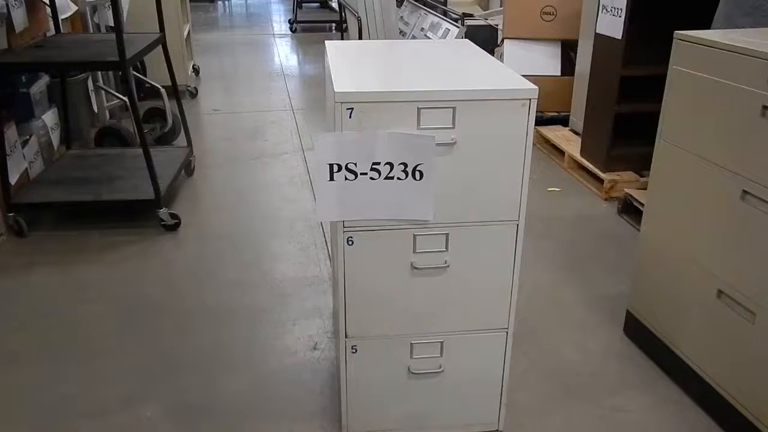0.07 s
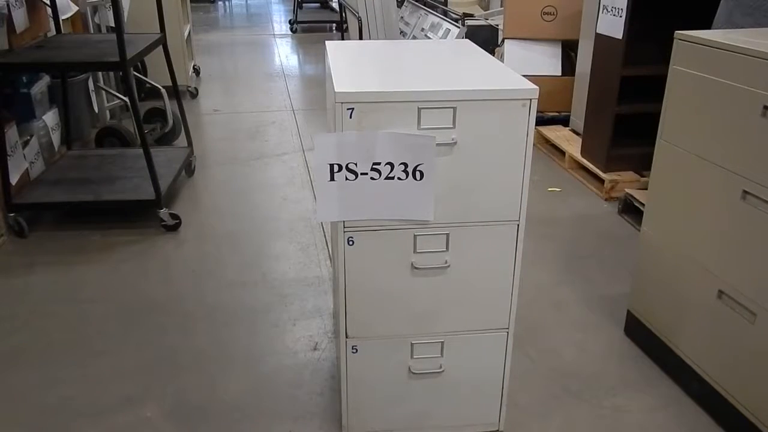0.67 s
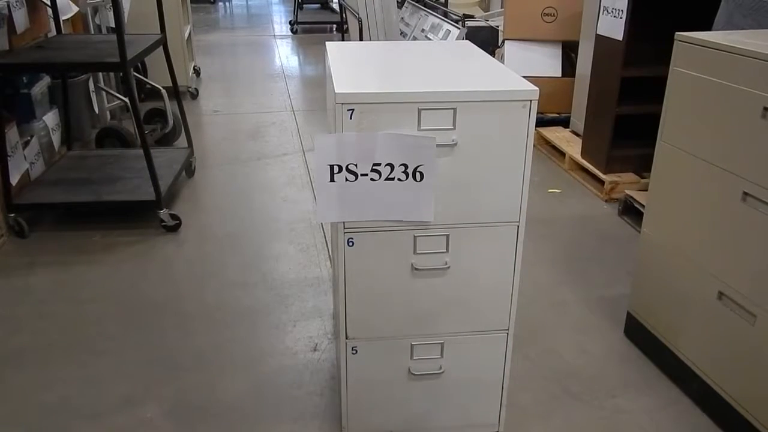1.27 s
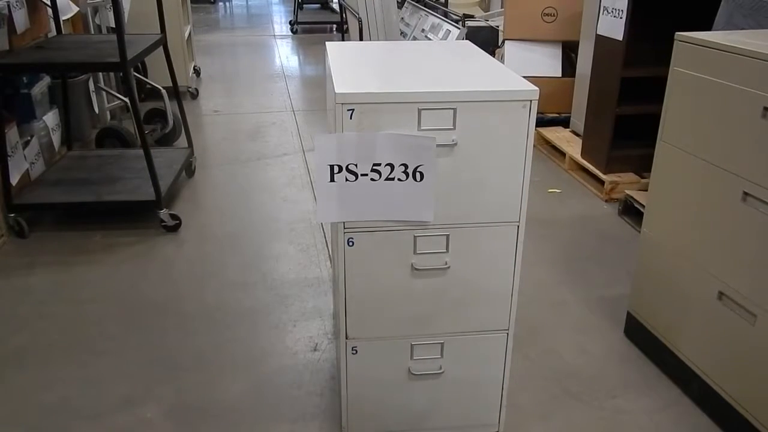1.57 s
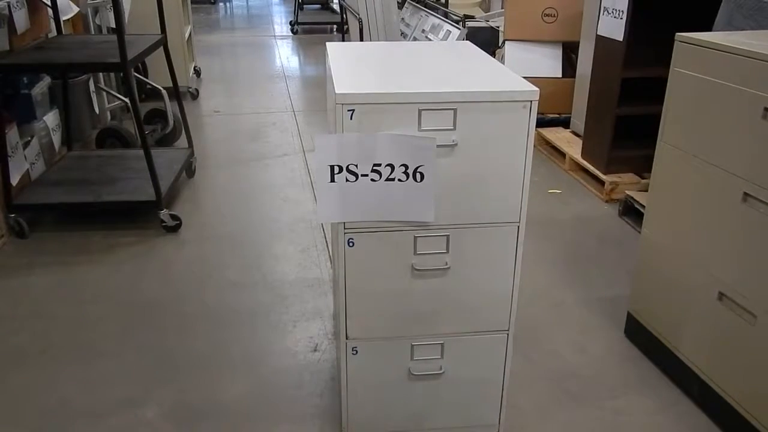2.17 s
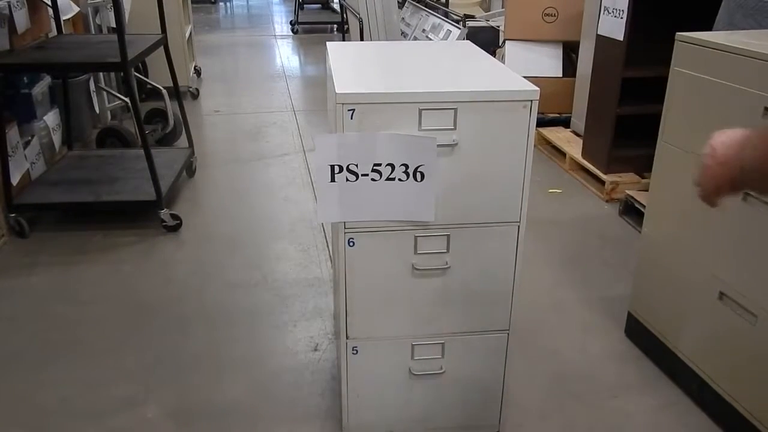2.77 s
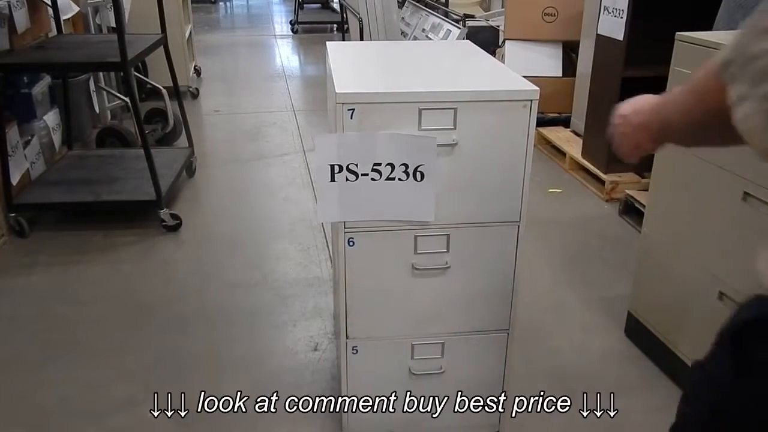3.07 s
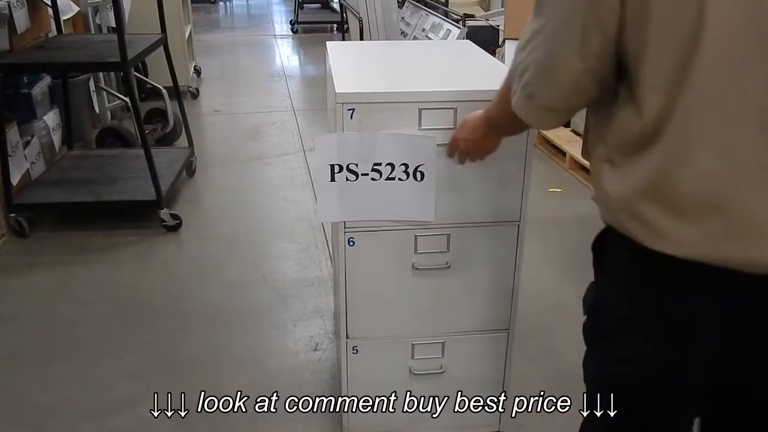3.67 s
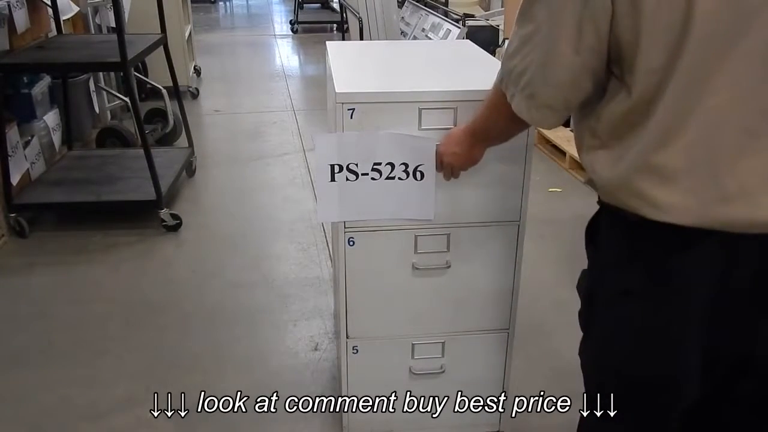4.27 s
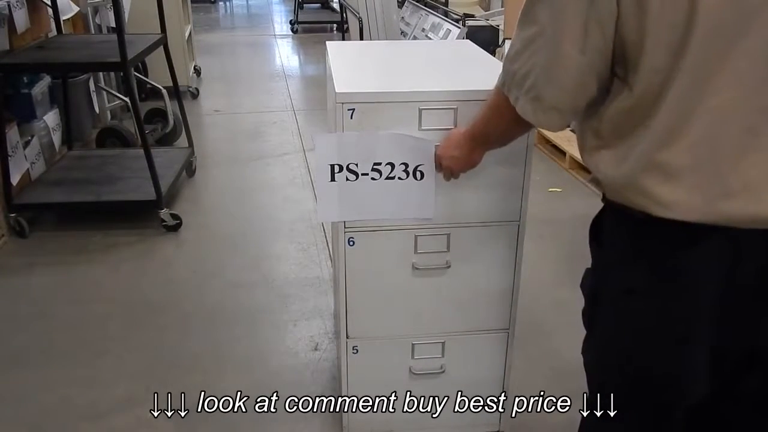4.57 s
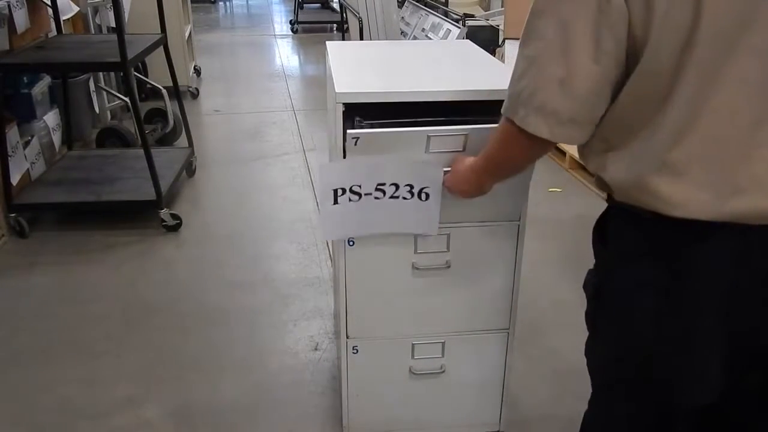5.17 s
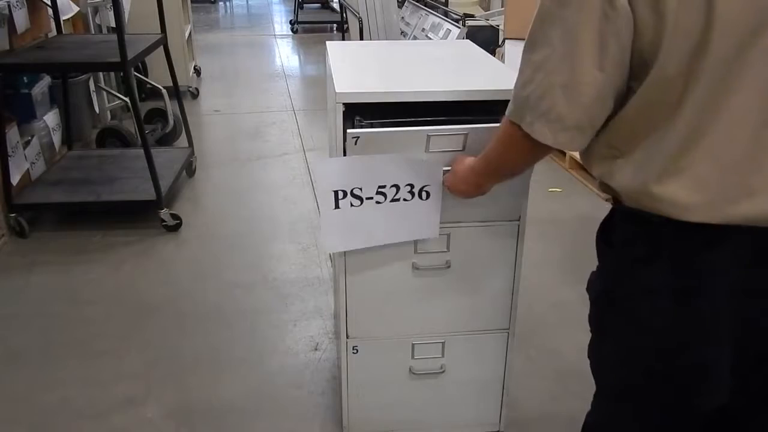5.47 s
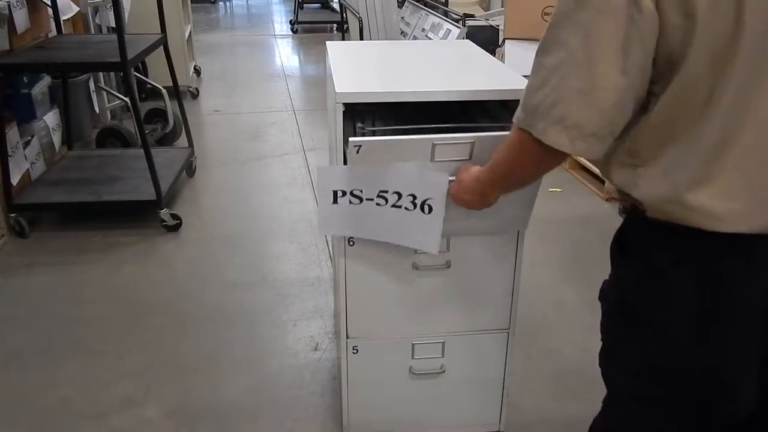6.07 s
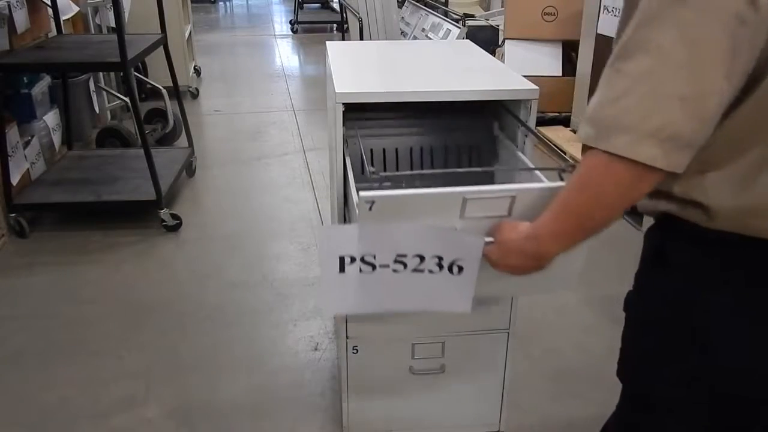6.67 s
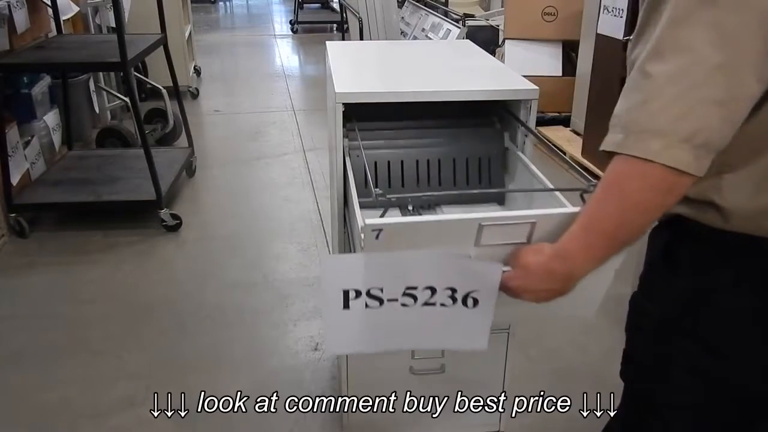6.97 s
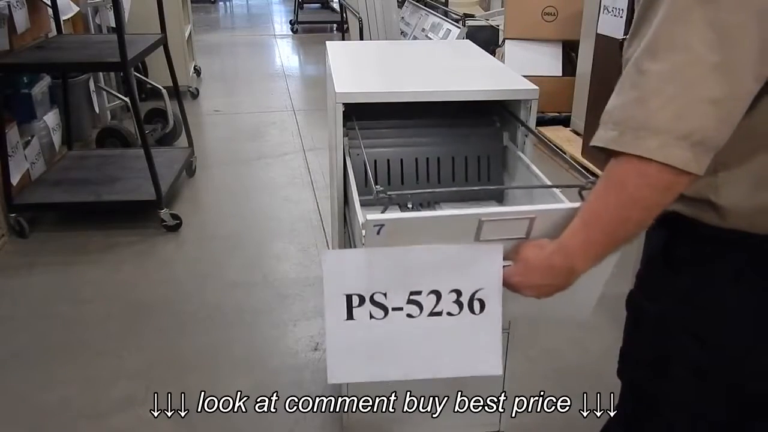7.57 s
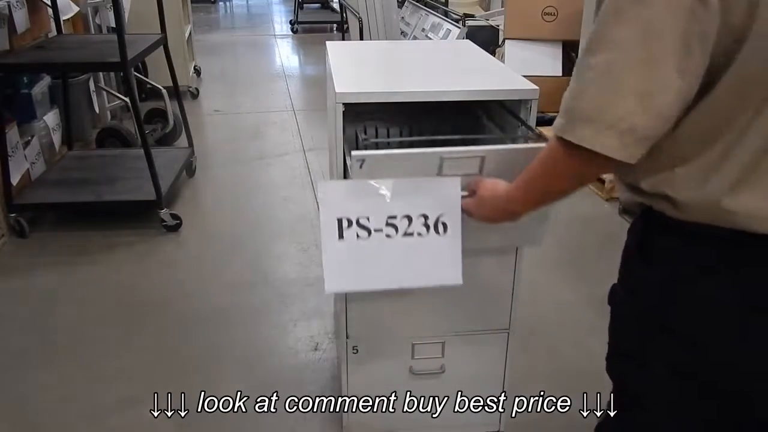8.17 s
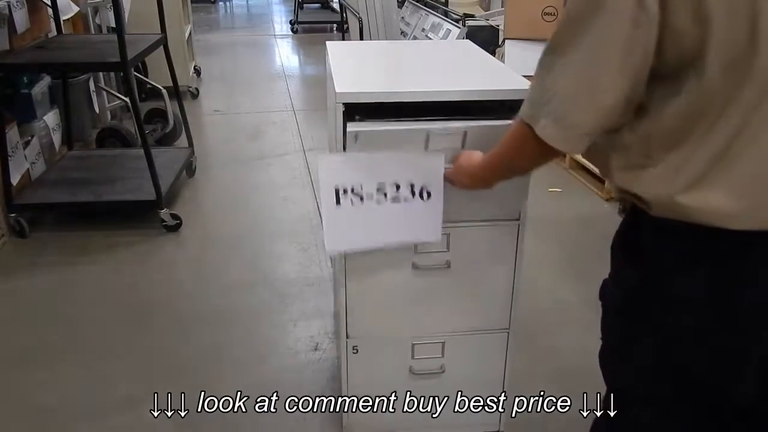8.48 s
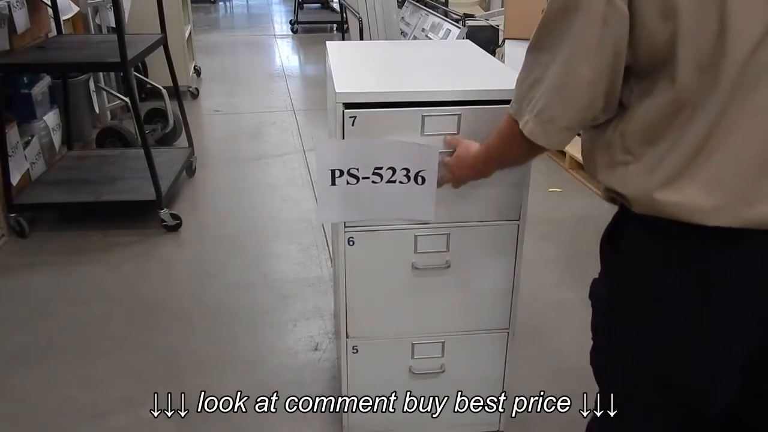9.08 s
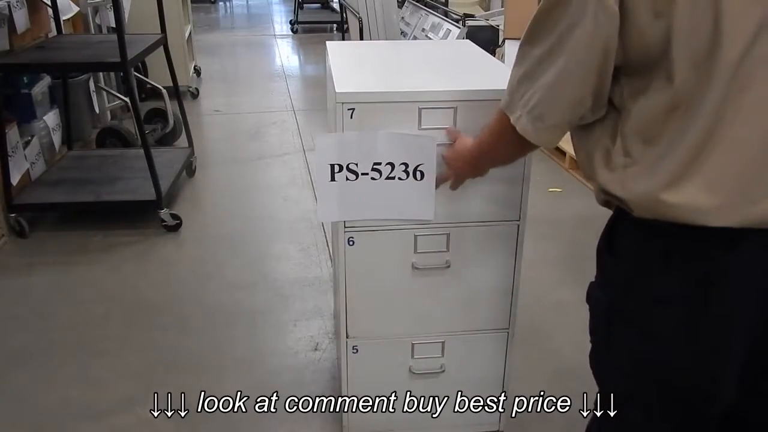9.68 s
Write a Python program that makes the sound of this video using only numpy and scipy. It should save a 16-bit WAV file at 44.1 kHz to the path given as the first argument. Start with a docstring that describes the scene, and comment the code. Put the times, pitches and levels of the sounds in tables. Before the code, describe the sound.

An empty metal filing cabinet is opened and closed near a stereo microphone. First come a hollow thud, faint steps on concrete and rustling cloth over a low rush of ventilation. The handle is grabbed and the drawer jerks loose with a bright crash. Its rollers rumble and clatter outward, pause briefly and run back in. Two bangs close it, each making the sheet steel boom and echo through the warehouse.

```python
"""An empty steel filing cabinet, close to a stereo microphone in a warehouse with quiet ventilation.
Something hollow is set down with a thud and a person walks up, clothes brushing. A hand takes the
handle, the latch clicks and the top drawer breaks free with a crash, rolls out and back on rattling
rollers, bangs into its catch and is shoved home with a second bang. Each blow sets the sheet steel
booming, and the hall rings on behind it."""
import sys
import numpy as np
from scipy import signal
from scipy.fft import rfft, irfft, next_fast_len
from scipy.io import wavfile

SR = 44100
rng = np.random.default_rng(int(sys.argv[2]) if len(sys.argv) > 2 else 0)


def file_out(sig):
    """Save sig as 16-bit WAV at sys.argv[1]."""
    # one column per channel
    cols = np.atleast_2d(sig).T
    # limit, then scale
    lim = np.clip(cols, -1, 1)
    pcm = np.round(lim * 32767).astype(np.int16)
    wavfile.write(sys.argv[1], SR, pcm)


N = 433062
TIME = np.arange(N) / SR

# two closely spaced microphone ports differ mostly in the treble: f/Hz, side minus mid/dB
PORT_SPREAD = [(60, -50), (700, -24.5), (1400, -43), (2400, -7.5), (4400, -7), (8000, -6.5), (15000, -23)]
# the drawer bangs free, into its catch and home: t/s, level/dB, rise/s, bass/dB,
# rebound against hit/dB, settling against hit/dB, box shudder/dB, panel boom/dB
DRAWER_BANGS = [(5.062, -8, 0.0029, 1.5, -1, -12, -27.5, -5), (8.531, -5, 0.0038, 6.5, -5.5, -8, -24.5, -4),
                (9.2413, -6.5, 0.0066, 4.5, -12, -38, -33, 0.5)]
REBOUND_AFTER_S = 0.021


def from_db(db):
    """Decibels to gain."""
    return np.exp(np.asarray(db) * (np.log(10) / 20))


def unit(x):
    """Scale to energy one."""
    return x / np.sqrt(np.sum(x ** 2) + 1e-20)


def at_hz(points, hz):
    """Read a table on a log-frequency axis."""
    f, value = np.transpose(points)
    return np.interp(np.log(np.maximum(hz, 1)), np.log(f), value)


def colour(x, spectrum):
    """Weight a sound by a smooth spectrum."""
    size = next_fast_len(N)
    gain = from_db(at_hz(spectrum, np.fft.rfftfreq(size, 1 / SR)))
    return irfft(rfft(x, size) * gain, size)[..., :N]


def convolve(x, response):
    """Play a sound through a response."""
    return signal.fftconvolve(np.atleast_2d(x), np.atleast_2d(response), axes=-1)[:, :N]


def butter(x, hz, kind, order=2):
    """Butterworth filter."""
    return signal.sosfilt(signal.butter(order, hz, kind, fs=SR, output="sos"), x)


def drift(rate_hz):
    """A random wander of spread about one."""
    knots = rng.standard_normal(int(N / SR * rate_hz) + 2)
    return np.interp(TIME * rate_hz, np.arange(len(knots)), knots)


def add(track, s, sound):
    """Lay a sound into a track at a time."""
    at = int(s * SR)
    track[..., at:at + sound.shape[-1]] += sound[..., :N - at]


def ports(mid, side):
    """Left and right from their common part and their difference."""
    return np.array([mid + side, mid - side])


def steady_noise(spectrum, spread):
    """Diffuse stereo noise whose mid has level one."""
    mid, side = colour(rng.standard_normal((2, N)), spectrum)
    return ports(mid, colour(side, spread)) / np.std(mid)


def dense_modes(spectrum, decays, size):
    """Stereo response of countless overlapping modes; each band dies at its own rate."""
    t, f = np.arange(size) / SR, np.fft.rfftfreq(size, 1 / SR)
    edges_hz = np.geomspace(35, 17000, 20)
    white = rfft(rng.standard_normal((2, size)))
    response, energy = 0, 0
    for low, high in zip(edges_hz, edges_hz[1:]):
        hz = np.sqrt(low * high)
        band = irfft(white * ((f >= low) & (f < high)), size)
        onset = 1 - np.exp(-(t * hz) ** 2)   # a mode needs about one cycle to get going
        mid, side = band * onset * from_db(-60 * t / at_hz(decays, hz))
        gain = from_db(at_hz(spectrum, hz)) * np.sqrt(high - low)
        response += gain * ports(unit(mid), unit(side) * from_db(at_hz(PORT_SPREAD, hz)))
        energy += gain ** 2
    return response / np.sqrt(energy)


def ringing(modes):
    """Response of a few distinct modes, each a dying sine."""
    t = np.arange(SR // 2) / SR
    return sum((-1) ** k * from_db(db - 60 * t / t60) * np.sin(2 * np.pi * hz * t)
               for k, (hz, db, t60) in enumerate(modes))


def averaged(force, spectrum):
    """A body's colour with its single modes averaged out, as over all directions or along a movement."""
    gain = from_db(at_hz(spectrum, np.arange(SR // 2)))
    return colour(force, spectrum) / np.sqrt(np.mean(gain ** 2))


def radiate(force, spectrum, decays):
    """A force drives a body's dense modes; rows are left, right and the send into the hall."""
    direct = convolve(force, dense_modes(spectrum, decays, size=SR // 7))
    return np.vstack([direct, averaged(force, spectrum)])


def clatter(decay, grain_db=4.0, rise=0.0004):
    """Loose parts meet in a dying shower of tiny impacts, with the energy of 10 ms at full level."""
    t = np.arange(SR // 6) / SR
    impacts = rng.standard_normal(len(t)) * from_db(grain_db * rng.standard_normal(len(t)))
    envelope = np.exp(-t / decay) * (1 - np.exp(-(t / rise) ** 2))
    return unit(impacts * envelope) * np.sqrt(SR // 100)


def showers(rows):
    """Force of a table of clattering touches."""
    force = np.zeros(N)
    for s, db, decay in rows:
        add(force, s, from_db(db) * clatter(decay))
    return force


def blows(rows):
    """Force of a table of single clean blows."""
    force = np.zeros(N)
    for s, db in rows:
        add(force, s, from_db([db]))
    return force


def struck(rows, modes, lowest_hz=70):
    """Clean blows on a body with distinct modes; a small body radiates little deep bass."""
    return butter(convolve(blows(rows), ringing(modes)), lowest_hz, "high")


def ventilation(level_db=-49.5):
    """Room tone: moving air, steady and wide."""
    air_colour = [(20, -10), (41, 4.5), (58, -3.5), (130, 1), (280, -8.5), (650, -13), (1250, -13),
                  (1850, -10), (2750, -15), (3300, -14.5), (4100, -22), (5800, -12), (7100, -23.5),
                  (8500, -23.5), (10500, -38)]   # spectrum of the air: f/Hz, density/dB
    air_spread = [(60, -15), (300, -8), (1400, -6), (3100, 0), (7000, -2), (12000, 1)]   # its stereo width: f/Hz, side minus mid/dB
    return from_db(level_db) * steady_noise(air_colour, air_spread)


def thin_whine(hz=3530, level_db=-58, until_s=0.25):
    """A faint, thin whine stops after a moment."""
    fade = np.clip((until_s - TIME) / 0.02, 0, 1)
    return from_db(level_db) * np.sin(2 * np.pi * hz * TIME + drift(41)) * fade


def clothes(crinkle_db=2.5, treble_hz=2500):
    """Cloth brushes close to the microphone in uneven swishes that swell and fade."""
    swishes = [(0.413, -54, 0.026, 8.5), (2.384, -46, .018, 4.5), (2.724, -44.5, 0.13, -21),
               (3.2, -47, 0.19, -7)]   # swishes of cloth: middle/s, level/dB, half length/s, treble/dB
    cloth_colour = [(300, 0.5), (1500, -2), (2400, 1), (3500, 0.5), (6000, 3), (7500, -18.5), (12000, -34)]   # spectrum of the rubbing: f/Hz, level/dB
    rub = from_db(crinkle_db * drift(98)) * steady_noise(cloth_colour, PORT_SPREAD)
    treble = butter(rub, treble_hz, "high", order=1)
    sound = 0
    for s, db, half, treble_db in swishes:
        swell = from_db(db) * np.exp(-0.5 * ((TIME - s) / half) ** 2)
        sound += swell * (rub + (from_db(treble_db) - 1) * treble)
    return sound


def footsteps(sole_t60=0.02):
    """Soft soles land on concrete with hardly any ring."""
    steps = [(.70, -45, 0.022), (1.027, -47, 0.0067), (2.22, -43, 0.026), (2.33, -44, 0.011),
             (2.47, -44, 0.026), (2.592, -42, 0.0095), (2.89, -38.5, 0.035), (3.302, -44.5, 0.0059)]   # footfalls: t/s, level/dB, decay/s
    sole_colour = [(50, -6), (130, -10), (230, -3.5), (500, -12.5), (1000, -18), (3000, -32), (10000, -51)]   # spectrum of a step: f/Hz, level/dB
    return radiate(showers(steps), sole_colour, [(1000, sole_t60)])


def warehouse(send, wet_db=-12.5, build_up_s=0.004):
    """The hall's echoes build up over the first moments and then die slowly, lows last."""
    hall_colour = [(40, 21.5), (100, 6), (300, 7.5), (1000, 0.5), (3000, -3.5), (6000, -4.5), (9000, -8),
                   (15000, -8)]   # spectrum of the echoes: f/Hz, level/dB
    hall_t60 = [(60, 5.7), (200, 1.31), (600, 1.28), (2000, 2.08), (5000, 1.65), (8000, 0.83),
                (14000, 0.17)]   # reverberation time: f/Hz, t60/s
    tail = dense_modes(hall_colour, hall_t60, size=3 * SR // 2)
    onset = 1 - np.exp(-np.arange(tail.shape[1]) / SR / build_up_s)
    return from_db(wet_db) * convolve(send, tail * onset)


def thud(knock_t60=0.033):
    """A hollow thing is set down and rocks once: short knocks and a low ring."""
    landings = [(1.1785, 1.5), (1.1985, -4), (1.2102, 2.5)]   # its contacts: t/s, level/dB
    hollow_modes = [(231, -24.5, 0.16), (296, -25, 0.16), (405, -39, 0.52), (451, -38, 0.47),
                    (482, -38, 0.48), (610, -46, 0.11), (896, -35, 0.12), (1213, -37, 0.098),
                    (1605, -46, 0.17)]   # its body's modes: f/Hz, level/dB, t60/s
    knock_colour = [(40, -22), (80, 0), (250, -7), (450, 5.5), (800, -11), (1500, -17.5), (3000, -24),
                    (6000, -30), (8000, -52), (15000, -70)]   # spectrum of a knock: f/Hz, level/dB
    ring = struck(landings, hollow_modes, lowest_hz=190)
    return ring + radiate(blows(landings), knock_colour, [(1000, knock_t60)])


def hand_on_handle():
    """The hand meets the handle and the drawer front gives a thump."""
    grab = [(3.855, -0.5)]   # the hand's blow: t/s, level/dB
    front_modes = [(129, -20, 0.086), (169, -22, 0.093), (232, -24, 0.12), (310, -27, 0.074),
                   (540, -25.5, 0.032)]   # modes of the drawer front: f/Hz, level/dB, t60/s
    return struck(grab, front_modes)


def steel_contacts(light_rise_s=0.0008, knock_bass_db=-5, thinning=0.55, settle_after_s=0.062):
    """Latch, roller knocks and bangs as rows of t/s, level/dB, decay/s, bass/dB, treble/dB, rise/s."""
    # the handle is gripped, the latch clicks and drags free: t/s, level/dB, decay/s, bass/dB, treble/dB
    latch = [(3.854, -31, 0.0032, 6, 0), (3.868, -31.5, 0.03, 6, 8.5), (4.8628, -29.5, 0.0019, -11, -5),
             (4.991, -18, 0.12, 1.5, -5.5), (5.028, -11, 0.074, -1.5, 1.5)]
    # the rollers knock over joints and stops in the rails: t/s, level/dB, decay/s, treble/dB
    knocks = [(5.897, -29.5, 0.013, 4.5), (5.982, -30.5, 0.04, -10), (6.088, -26, 0.019, -3),
              (6.204, -25.5, 0.036, -4), (6.395, -25.5, 0.018, 9), (6.515, -29.5, .043, 3),
              (6.602, -35, 0.013, 6), (6.781, -27, 0.031, 21), (6.924, -30.5, 0.046, -8.5),
              (7.511, -27.5, .014, -5.5), (7.604, -30.5, .0075, -13), (7.621, -26.5, 0.015, 5),
              (7.735, -32, 0.012, -2), (7.812, -33.5, .025, -12), (7.954, -30.5, 0.033, -11),
              (8.419, -23.5, 0.083, 7)]
    rows = [(*touch, light_rise_s) for touch in latch]
    for s, db, decay, treble_db in knocks:
        bass_db = knock_bass_db - thinning * treble_db   # the brighter a knock, the less bass it has
        rows.append((s, db, decay, bass_db, treble_db, light_rise_s))
    for s, db, rise, bass_db, rebound_db, settle_db, _, _ in DRAWER_BANGS:
        hit = (s, db, 0.016, bass_db, -0.7, rise)
        rebound = (s + REBOUND_AFTER_S, db + rebound_db, 0.027, bass_db, 1.5, rise)
        settling = (s + settle_after_s, db + settle_db, 0.061, bass_db, -2.5, rise)
        rows += [hit, rebound, settling]
    return rows


def drawer_hits(bass_hz=350, treble_hz=(2800, 7000), crash_db=-16, hard_from_db=-14, ring_db=-41):
    """Contacts strike the steel at changing spots; only hard ones drive it into a bright crash."""
    steel_colour = [(40, -31), (80, 2.5), (160, -3), (300, -1.5), (800, 1.5), (1300, 0.5), (2000, 1.5),
                    (3300, -1.5), (4100, -2), (5400, -0.5), (6400, -7), (7500, -21), (9300, -62),
                    (10500, -53), (15000, -64)]   # dense modes of the sheet steel: f/Hz, density/dB
    steel_t60 = [(80, 0.073), (400, 0.04), (1500, 0.037), (5000, 0.017), (12000, 0.033)]   # their ring time: f/Hz, t60/s
    rail_modes = [(835, -20, .2), (1365, -24, .16), (1567, -23, .16), (2056, -21, .12), (4626, -23, .12),
                  (5160, -19, .13), (5394, -23, .14), (5775, -24, .2), (6085, -24, .16)]   # ringing of drawer and rails: f/Hz, level/dB, t60/s
    crash_colour = [(3000, -45), (6000, 9), (7800, 4.5), (9300, 0), (10500, -9.5), (12500, -16),
                    (15000, -26)]   # thin steel driven hard: f/Hz, density/dB
    force, hard_force = np.zeros((2, N))
    direct = np.zeros((2, N))
    spots = [dense_modes(steel_colour, steel_t60, size=4096) for _ in range(8)]
    for k, (s, db, decay, bass_db, treble_db, rise) in enumerate(steel_contacts()):
        hit = from_db(db) * np.array([clatter(decay, rise=rise), clatter(decay, rise=rise)])
        add(hard_force, s, from_db(min(db - hard_from_db, 0)) * hit[1])
        hit += (from_db(bass_db) - 1) * butter(hit, bass_hz, "low", order=1)
        hit += (from_db(treble_db) - 1) * butter(hit, treble_hz, "band", order=1)
        # the front faces the microphone, the rest of the cabinet clatters into the hall
        front, rest = hit * from_db(-treble_db / 2)
        add(force, s, rest)
        add(direct, s, convolve(front, spots[k % len(spots)]))
    direct += from_db(ring_db) * convolve(force, ringing(rail_modes))
    crash = from_db(crash_db) * radiate(hard_force, crash_colour, steel_t60)
    return np.vstack([direct, averaged(force, steel_colour)]) + crash


def handle_ticks(t60=0.021):
    """Handle, thumb latch and dry rails give small bright ticks and scrapes."""
    ticks = [(4.492, -41, 0.047), (6.525, -31.5, 0.072), (6.785, -22.5, 0.026), (7.625, -34, .016),
             (7.95, -37, 0.04), (8.06, -32.5, 0.036), (8.417, -26, 0.029), (8.832, -37, 0.0025),
             (8.952, -38, 0.0033), (9.091, -31.5, 0.026), (9.716, -31.5, 0.013), (9.757, -33, 0.024)]   # light touches: t/s, level/dB, decay/s
    tick_colour = [(300, -3), (2000, 6), (3500, 1.5), (5500, 8), (8500, -5), (11000, -20.5), (15000, -41)]   # their spectrum: f/Hz, level/dB
    return radiate(showers(ticks), tick_colour, [(1000, t60)])


def drawer_bumps(t60=0.21):
    """The drawer bumps with a hollow ring as it changes direction on its rails."""
    bumps = [(4.935, -31, .08), (5.860, -29, 0.22), (7.305, -29, 0.059), (7.511, -23.5, 0.029),
             (7.610, -24.5, 0.021)]   # dull touches: t/s, level/dB, decay/s
    bump_colour = [(35, -53), (100, -6.5), (400, -7.5), (650, 3), (950, -5.5), (1400, -10.5), (4000, -21.5),
                   (12000, -82)]   # their spectrum: f/Hz, level/dB
    return radiate(showers(bumps), bump_colour, [(1000, t60)])


def panel_boom(bend_s=0.00506, hall_db=4):
    """Each bang and its rebound set the side panels booming; in the hall their modes blur together."""
    panel_modes = [(70, -27, 0.61), (90.8, -16, 0.25), (104.6, -26, 0.6), (148.7, -30, 0.74),
                   (179, -29, 0.2), (252, -35, 0.3), (288, -24, 0.19), (312, -21, 0.23), (388.5, -25, 0.14),
                   (477, -36, 0.28), (499, -14.5, 0.14), (845, -18, 0.11)]   # modes of the panels: f/Hz, level/dB, t60/s
    boom_colour = [(45, -20), (85, -5), (110, 7), (200, -5), (400, -12), (1000, -29), (4000, -70)]   # the boom as it fills the hall: f/Hz, density/dB
    shoves = []
    for s, _, _, _, rebound_db, _, _, boom_db in DRAWER_BANGS:
        shoves += [(s + bend_s, boom_db), (s + bend_s + REBOUND_AFTER_S, boom_db + rebound_db)]
    direct = struck(shoves, panel_modes, lowest_hz=75)
    send = from_db(hall_db) * averaged(blows(shoves), boom_colour)
    return np.vstack([direct, direct, send])


def box_shudder(fall_db_per_s=42):
    """Strength of the drawer box's shaking as it dies away after each bang."""
    return sum((TIME > s) * from_db(shudder_db - fall_db_per_s * np.abs(TIME - s))
               for s, *_, shudder_db, _ in DRAWER_BANGS)


def drawer_travel(breakaway=0.27, speed_power=0.78, drive_power=0.43):
    """The drawer speeds up and coasts to rest: rumble follows speed, rattle also needs the hand's drive."""
    # pulled out, pushed back, then eased through the catch on a drive that has mostly faded:
    # start/s, end of run-up/s, drive starts fading/s, stop/s, full rumble/dB, full rattle/dB
    strokes = [(5.88, 6.445, 6.72, 7.2, -33, -35.5), (7.54, 7.997, 8.35, 8.68, -33.5, -34.5),
               (8.62, 8.717, 3.6, 9.27, -29, -13.5)]
    speed, rumble, rattle = np.zeros((3, N))
    for start, run_up_end, lets_go, stop, rumble_db, rattle_db in strokes:
        drive = np.interp(TIME, [lets_go, stop], [1, 0])
        pace = np.interp(TIME, [start, run_up_end], [breakaway, 1], left=0) * drive
        speed += pace
        rumble += from_db(rumble_db) * pace
        rattle += from_db(rattle_db) * pace ** speed_power * drive ** drive_power
    return speed, rumble, rattle


def rollers(rumble_db=-2, rattle_db=-1, grains_per_s=2200, uneven_db=2.0, box_t60=0.12,
            drone_hz=185, drone_db=-4):
    """Rollers run over rough rails: the box rumbles, the rails rattle and a drone rises with speed."""
    rattle_colour = [(35, -22), (200, -9), (600, 8.5), (1300, 0.5), (2000, 2), (3300, 1), (4100, 0),
                     (5500, -2), (6400, -5.5), (7500, -15), (9300, -25), (10500, -36), (15000, -52)]   # spectrum of the rails: f/Hz, level/dB
    box_colour = [(40, -43), (80, -5.5), (130, -4.5), (200, 1), (330, 1.5), (520, -4), (900, -12),
                  (1600, -14), (4000, -76)]   # spectrum of the drawer box: f/Hz, level/dB
    speed, rumble, rattle = drawer_travel()
    sizes = rng.choice([-1, 1], (2, N)) * from_db(uneven_db * drift(35))
    grains = sizes * (rng.random((2, N)) < grains_per_s / SR)
    # a travelling source keeps changing its modes, so only their average colour is heard
    mid, side = averaged(rattle * grains / np.std(grains), rattle_colour)
    rails = np.vstack([ports(mid, colour(side, PORT_SPREAD)), mid])
    roughness = rng.standard_normal(N) * from_db(uneven_db * drift(20))
    box = radiate(roughness * (rumble + box_shudder()), box_colour, [(1000, box_t60)])
    pitch_hz = drone_hz * speed ** 0.28 * (1 + 0.061 * drift(25))
    drone = rumble * drift(30) * np.sin(2 * np.pi * np.cumsum(pitch_hz) / SR)
    return from_db(rumble_db) * box + from_db(rattle_db) * rails + from_db(drone_db) * drone


def axle_squeak(pitches_hz=(8620, 9350), waver=0.0066, start_s=7.94, end_s=8.15, level_db=-58):
    """A dry axle sings two wavering, sputtering tones midway through the push."""
    tones = 0
    for hz in pitches_hz:
        pitch_hz = hz * (1 + waver * drift(200))
        tones += drift(80) * np.sin(2 * np.pi * np.cumsum(pitch_hz) / SR)
    fade = np.clip(np.minimum(TIME - start_s, end_s - TIME) / 0.02, 0, 1)
    return from_db(level_db) * fade * tones


def scene(near_send_db=-8):
    """The cabinet and the drier small sounds up close, the hall and its ventilation behind."""
    cabinet = drawer_hits() + panel_boom() + handle_ticks() + drawer_bumps() + rollers() + axle_squeak()
    near = thud() + footsteps() + hand_on_handle()
    hall = warehouse(cabinet[2] + from_db(near_send_db) * near[2])
    air = ventilation() + thin_whine()
    return (cabinet + near)[:2] + clothes() + hall + air


def record(dry, start_s=0.081, left_bass_db=-0.9, left_treble_db=0.08, right_lag_samples=0.26,
           ceiling=0.95, cutoff_hz=15750):
    """The microphone opens after an instant: slightly unequal ports, narrow notches, rounded peaks."""
    notches = [(2485, 170), (2515, 170), (5000, 70), (6000, 25), (7000, 50), (10000, 90), (11000, 90)]   # narrow gaps in its response: f/Hz, width/Hz
    bass_gain, treble_gain = from_db([left_bass_db, left_treble_db])
    left = bass_gain * dry[0] + (treble_gain - bass_gain) * butter(dry[0], 2000, "high", order=1)
    allpass = (1 - right_lag_samples) / (1 + right_lag_samples)
    right = signal.lfilter([allpass, 1], [1, allpass], dry[1])
    x = np.array([left, right])
    for hz, width in notches:
        x = signal.lfilter(*signal.iirnotch(hz, hz / width, fs=SR), x)
    x = x * np.clip((TIME - start_s) / 0.024, 0, 1)
    x = x / (1 + (x / ceiling) ** 6) ** (1 / 6)   # soft clipping
    steep_lowpass = signal.ellip(14, 0.1, 90, cutoff_hz, fs=SR, output="sos")
    return signal.sosfilt(steep_lowpass, x)


dry = scene()
out = record(dry)
file_out(out)
```